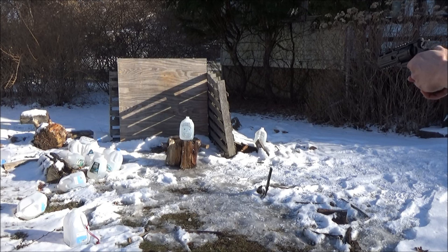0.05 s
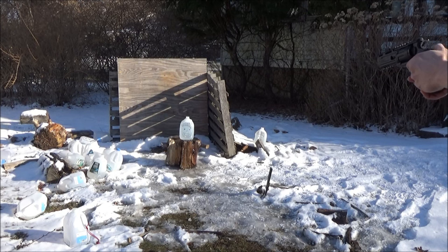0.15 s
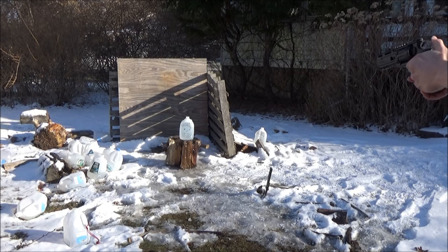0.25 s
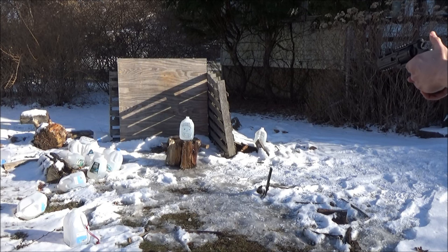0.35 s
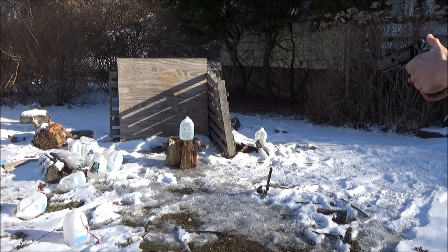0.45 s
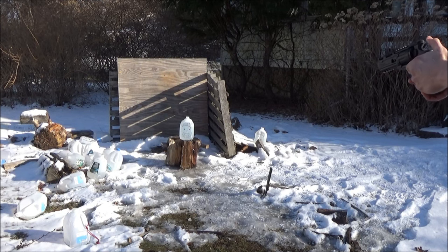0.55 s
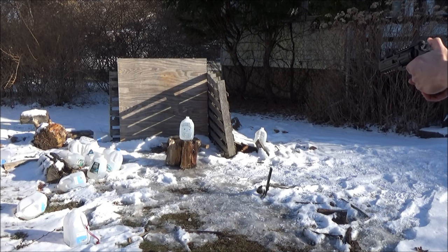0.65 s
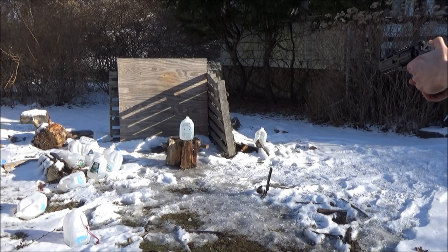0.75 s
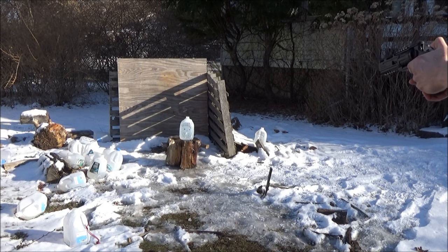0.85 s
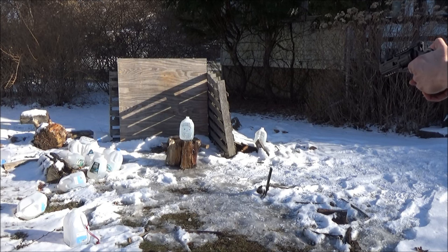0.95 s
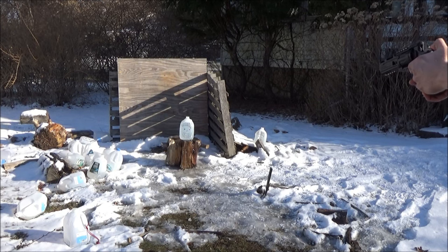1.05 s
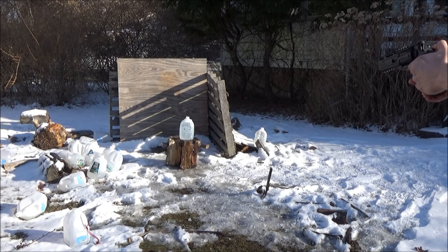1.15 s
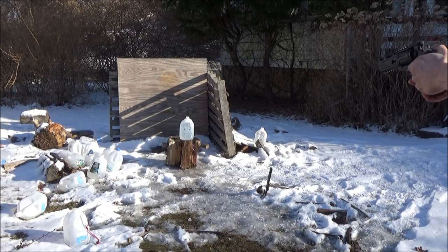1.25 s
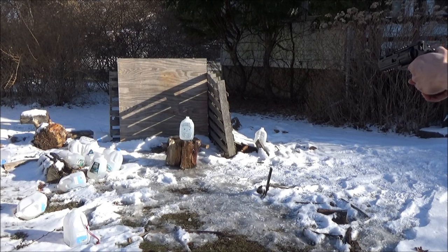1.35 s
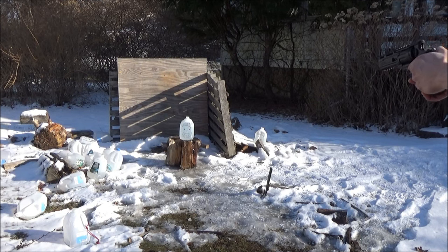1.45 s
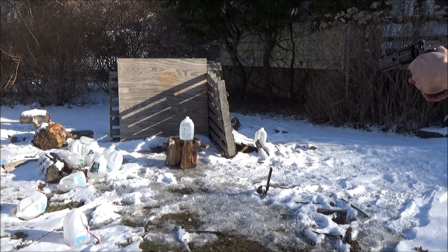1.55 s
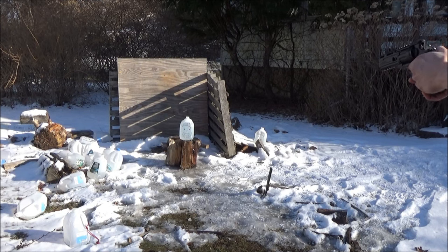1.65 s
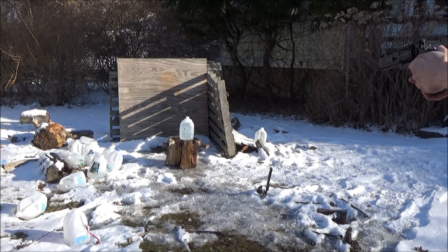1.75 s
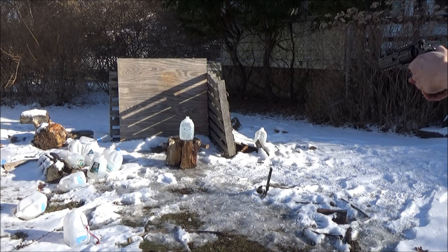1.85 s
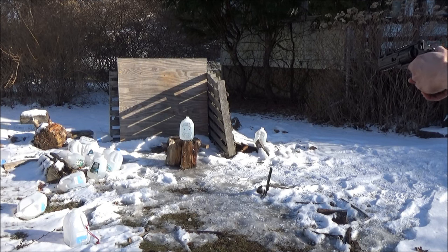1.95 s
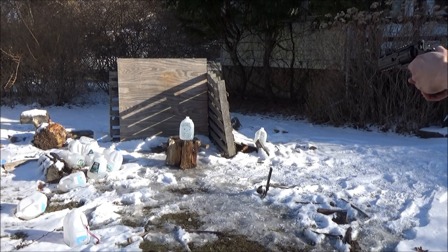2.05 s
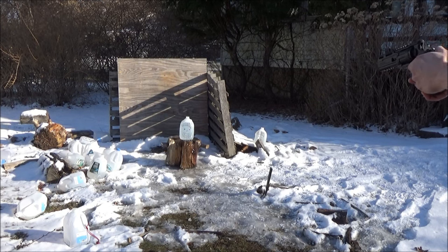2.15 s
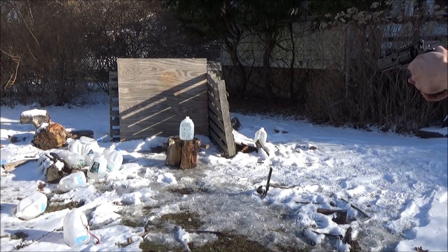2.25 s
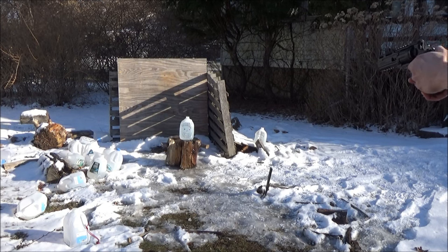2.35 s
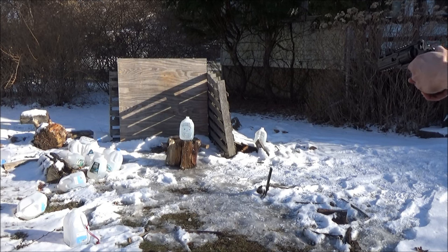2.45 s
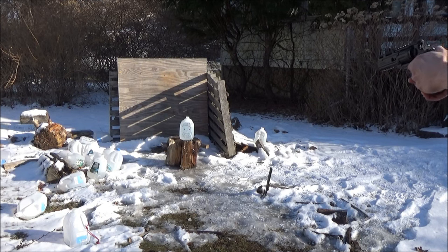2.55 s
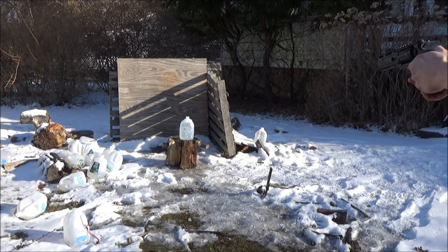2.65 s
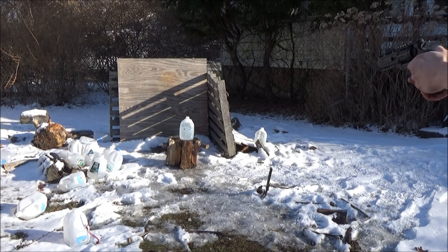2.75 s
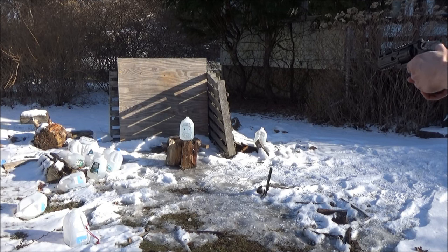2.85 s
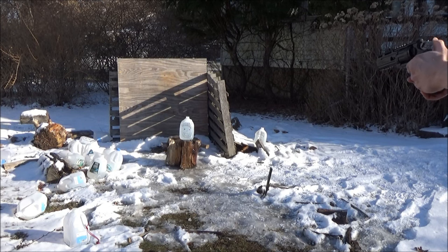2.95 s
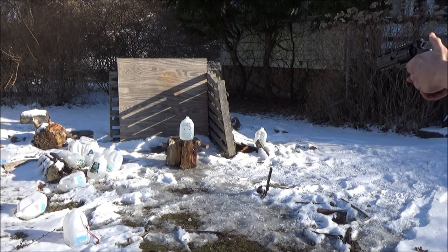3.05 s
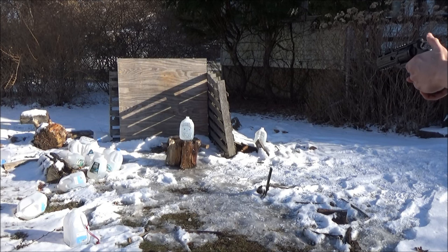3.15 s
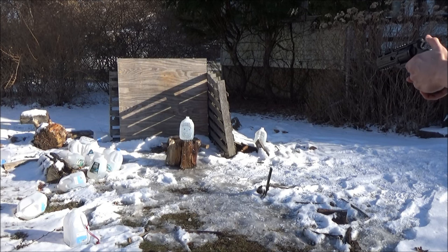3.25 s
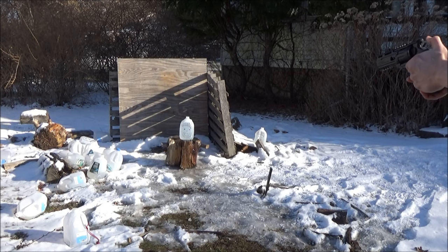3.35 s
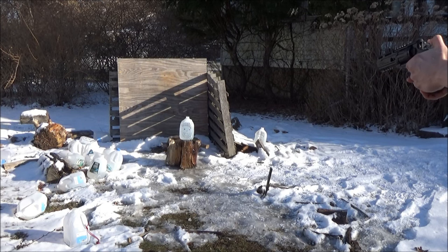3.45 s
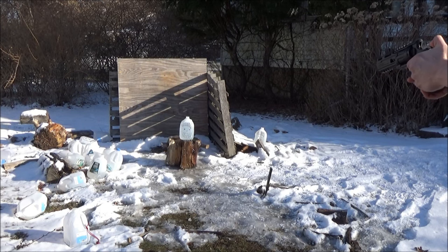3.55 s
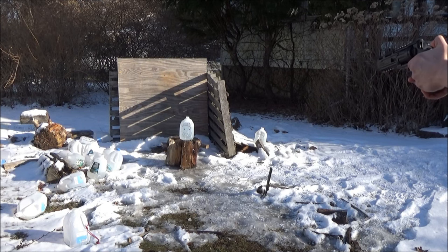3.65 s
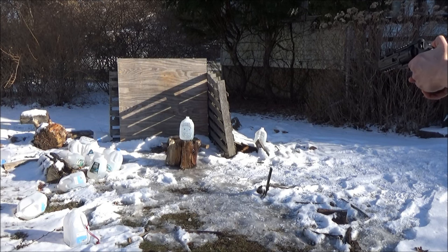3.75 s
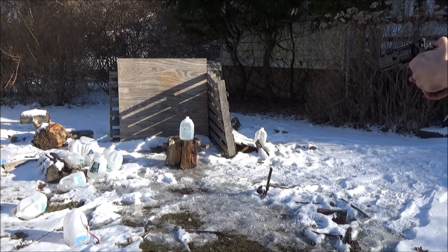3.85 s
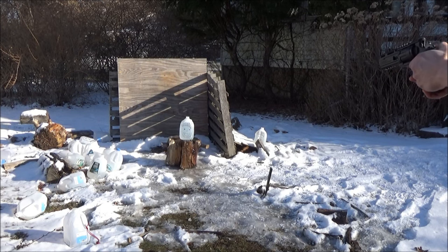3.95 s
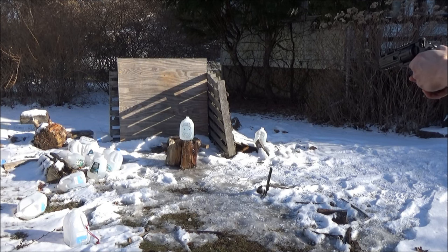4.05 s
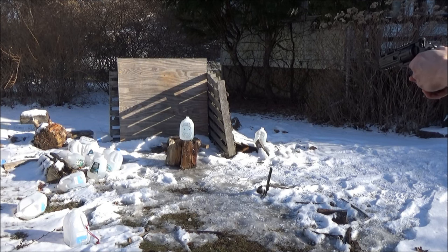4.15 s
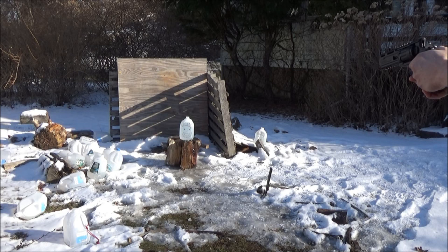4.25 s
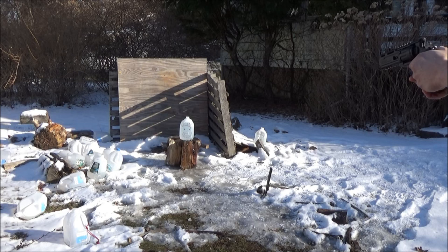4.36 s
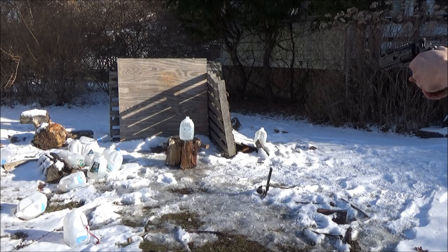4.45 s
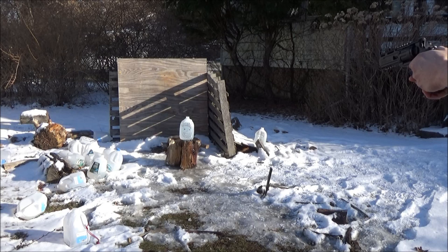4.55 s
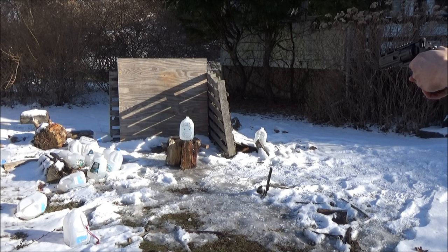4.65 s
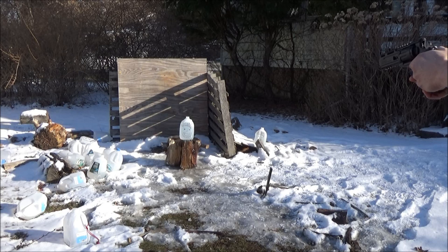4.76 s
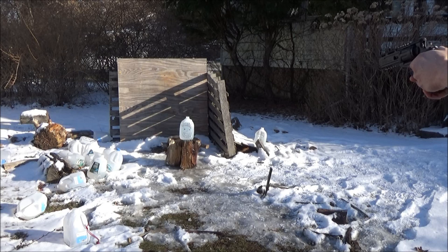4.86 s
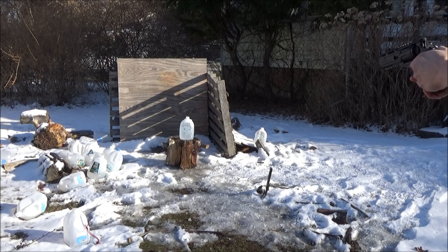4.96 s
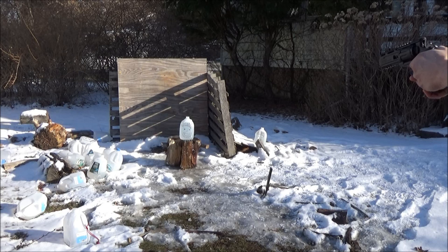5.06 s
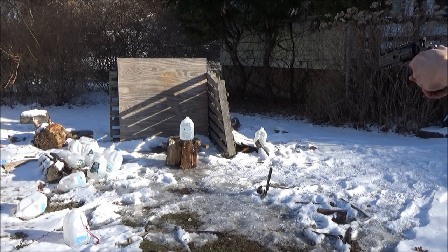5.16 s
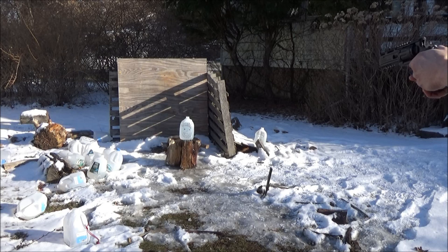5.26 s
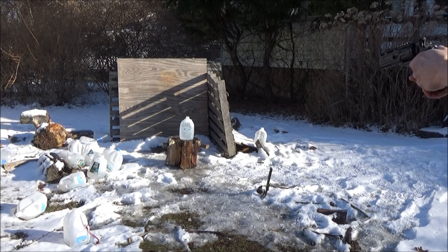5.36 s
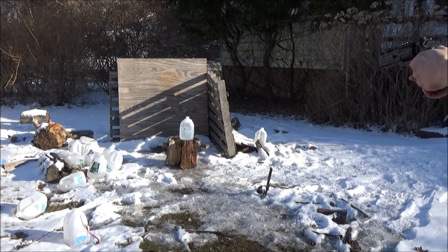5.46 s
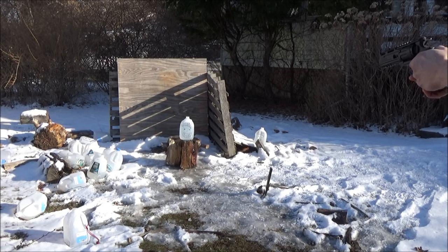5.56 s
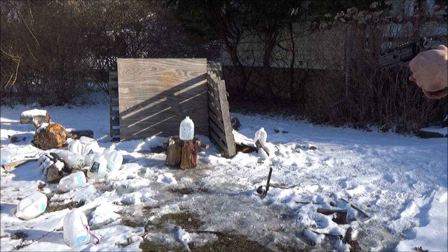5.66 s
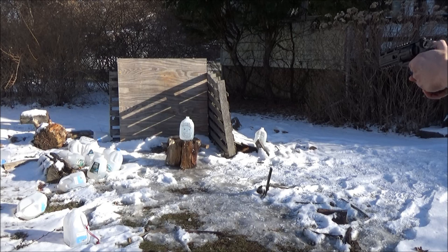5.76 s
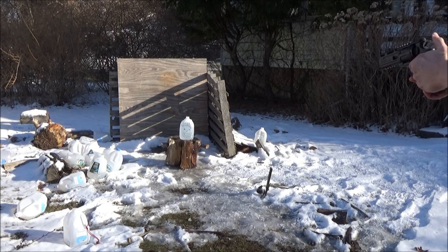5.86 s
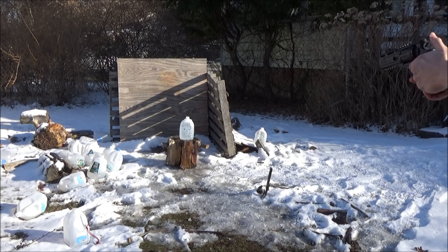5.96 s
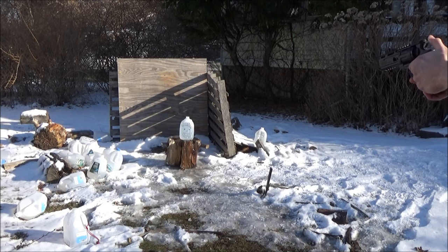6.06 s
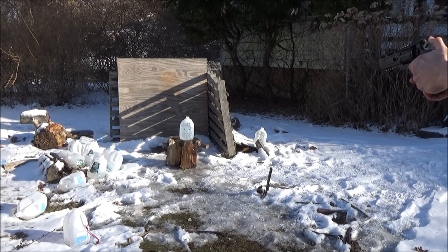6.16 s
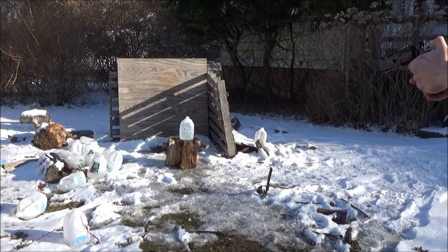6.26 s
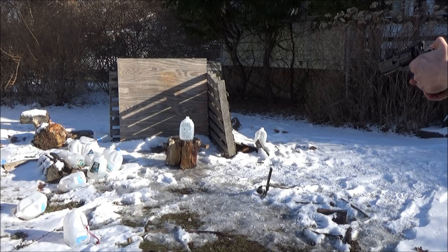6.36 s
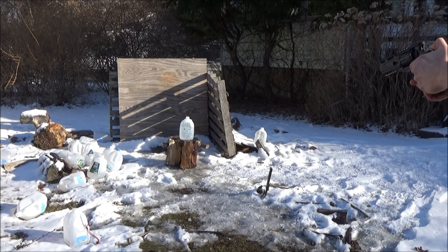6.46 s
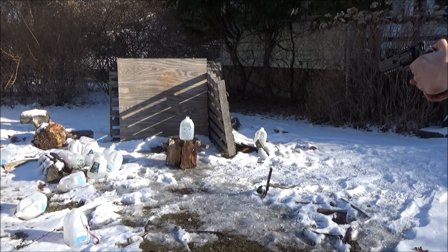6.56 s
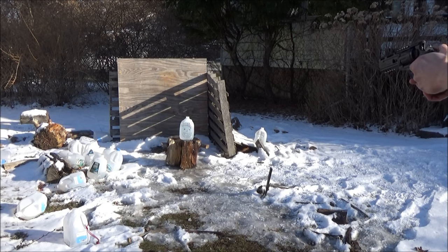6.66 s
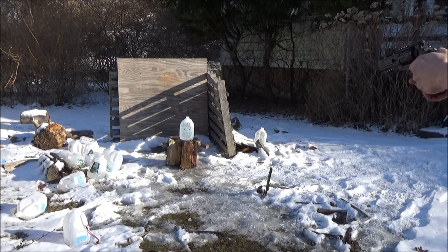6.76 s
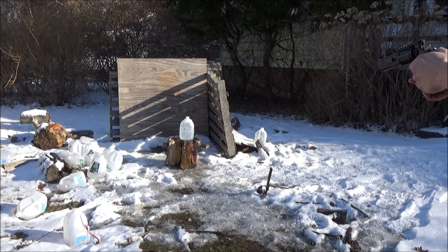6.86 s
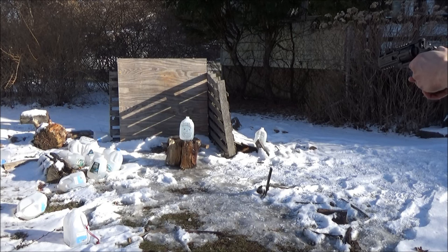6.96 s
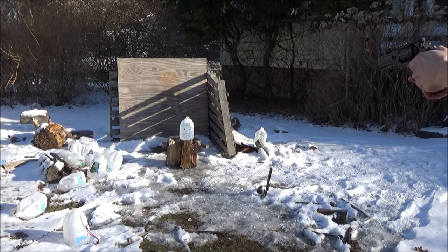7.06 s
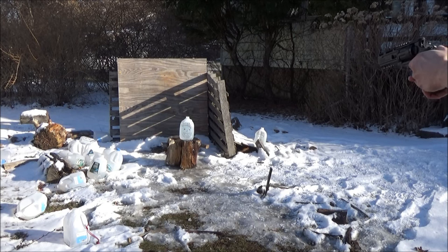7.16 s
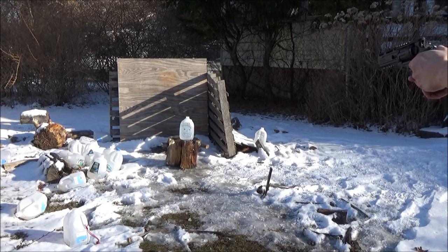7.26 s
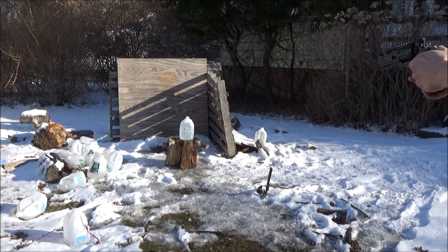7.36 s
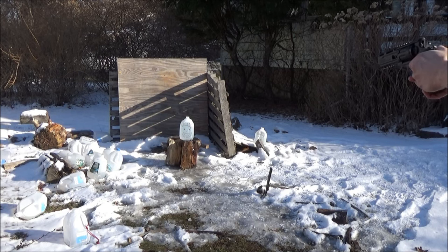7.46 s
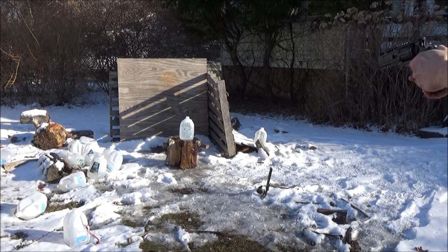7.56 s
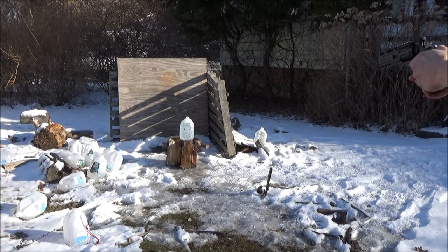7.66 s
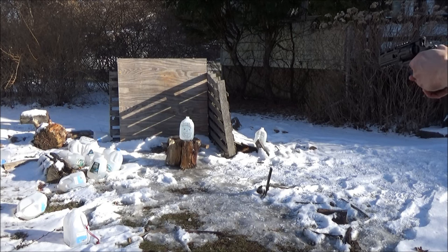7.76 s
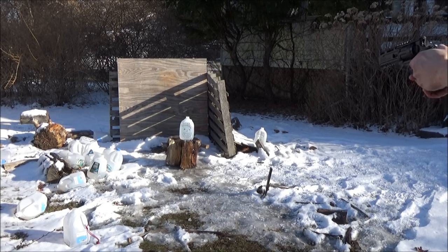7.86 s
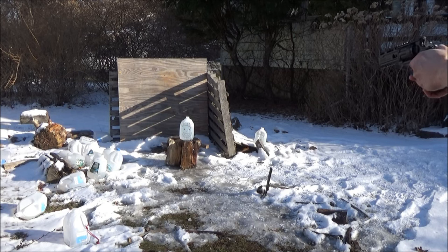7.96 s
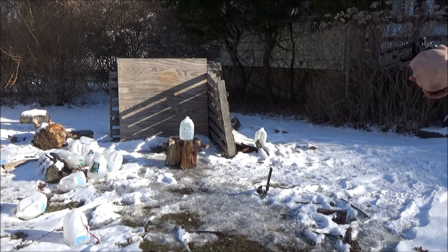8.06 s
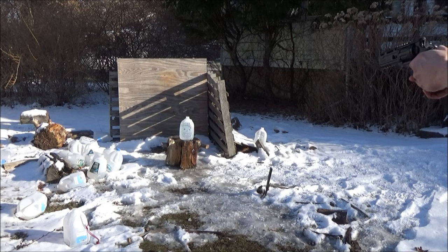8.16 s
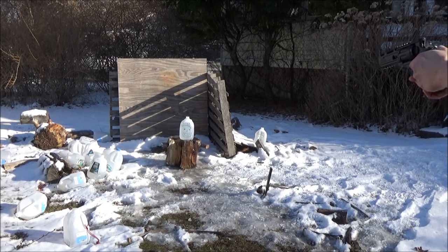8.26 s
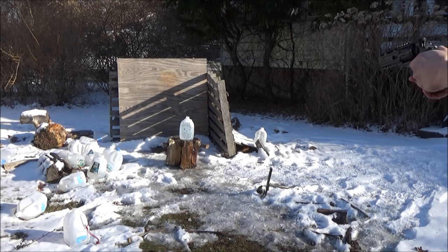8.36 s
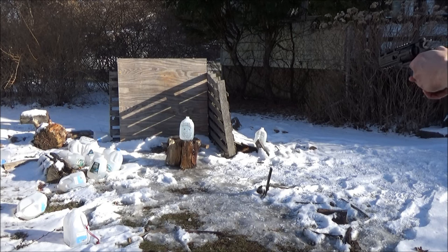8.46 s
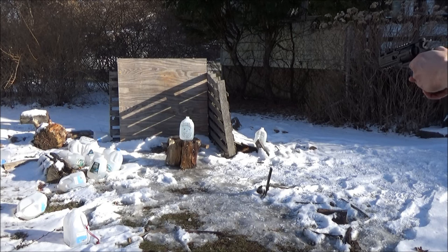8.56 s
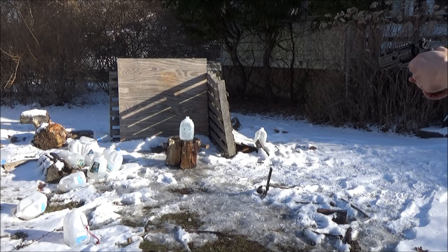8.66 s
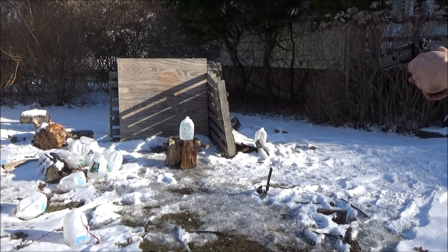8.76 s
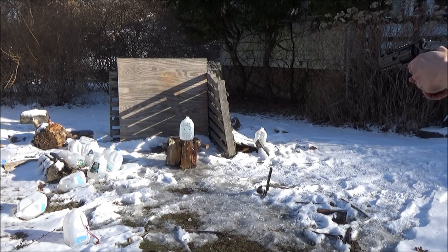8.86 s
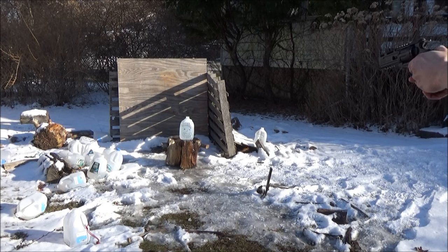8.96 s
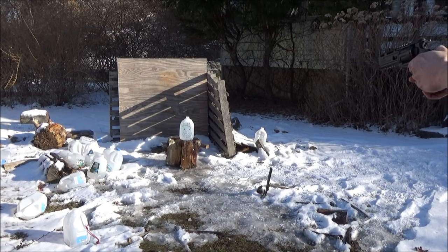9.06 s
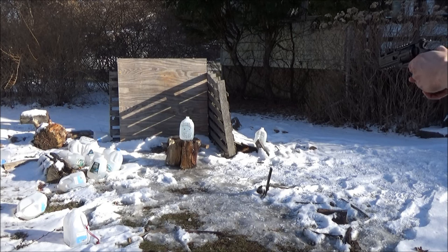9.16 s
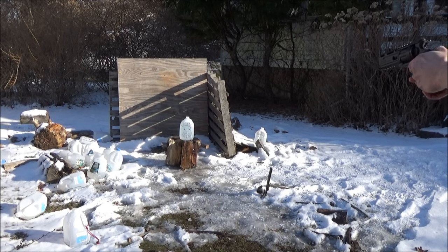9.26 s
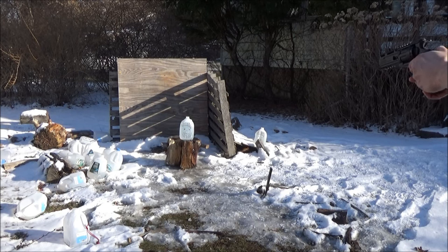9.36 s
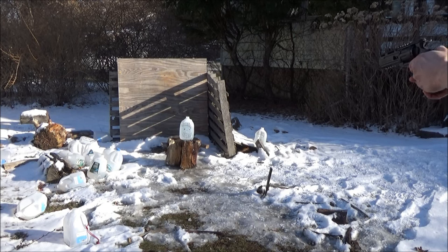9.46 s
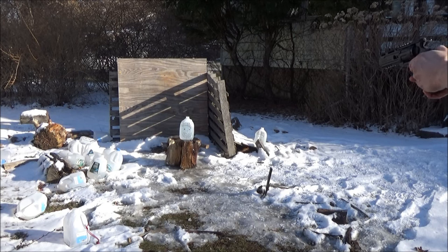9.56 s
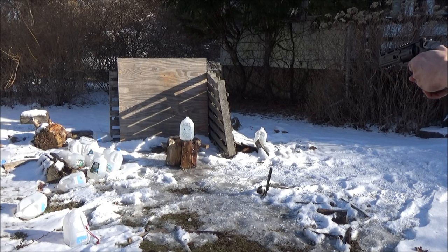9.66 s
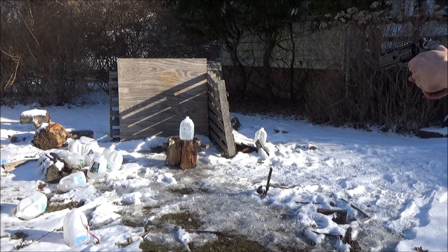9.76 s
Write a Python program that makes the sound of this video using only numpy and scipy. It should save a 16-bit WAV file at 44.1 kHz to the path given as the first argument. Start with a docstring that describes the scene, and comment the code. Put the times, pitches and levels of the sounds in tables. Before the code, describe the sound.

A gas revolver fires four sharp pops outdoors, with metallic cocking clicks between shots, over faint dripping meltwater and light wind.

```python
"""A gas revolver, cocked and fired four times in a snowy yard, close to the microphone.
Each pop is a burst of gas that rings the barrel and comes back off fences, boards, bushes and far houses;
the pellet thumps its target, and hammer, cylinder and trigger click. Meltwater drips and crackles close
by, over light wind and a distant hum. The gain control ducks everything after each shot."""
import sys
import numpy as np
from scipy import signal
from scipy.fft import rfft, irfft, next_fast_len
from scipy.io import wavfile
from scipy.ndimage import uniform_filter1d

SR = 44100
rng = np.random.default_rng(int(sys.argv[2]) if len(sys.argv) > 2 else 0)


def to_wav(s):
    """Save 16-bit WAV."""
    ch = np.atleast_2d(s).T  # columns
    pcm = np.round(np.clip(ch, -1, 1) * 32767)  # PCM
    wavfile.write(sys.argv[1], SR, pcm.astype(np.int16))


N = 432619


def gain_of(db):
    """Decibels to a factor."""
    return 10 ** (np.asarray(db) / 20)


def unit_rms(x):
    """Scales to rms 1."""
    return x / np.sqrt(np.mean(x ** 2) + 1e-20)


def add(mix, start_s, sound):
    """Mixes a sound in at a time."""
    part = mix[round(start_s * SR):][:len(sound)]
    part += sound[:len(part)]


def highpass(x, order, hz):
    """Rolls off the bass."""
    return signal.sosfilt(signal.butter(order, hz, "high", fs=SR, output="sos"), x)


def coloured(x, spectrum, tilt_db=0):
    """Filters by (frequency_hz, level_db) points, tilted by tilt_db an octave about 5 kHz."""
    hz = np.fft.rfftfreq(len(x), 1 / SR)
    point_hz, point_db = np.transpose(spectrum)
    db = np.interp(np.log(hz + 1), np.log(point_hz + 1), point_db)
    octaves = np.log2(np.clip(hz, 1300, 13000) / 5000)
    return irfft(rfft(x) * gain_of(db + tilt_db * octaves), len(x))


def noise(samples, spectrum, tilt_db=0):
    """Coloured noise with rms 1."""
    return unit_rms(coloured(rng.standard_normal(samples), spectrum, tilt_db))


def flicker(samples, depth_db, smooth):
    """A gain that wanders at random, smoothed over `smooth` samples."""
    return gain_of(depth_db * unit_rms(uniform_filter1d(rng.standard_normal(samples), smooth)))


def fade_in(x, rise_s):
    """Rounds the start of a sound."""
    return x * np.minimum(np.arange(len(x)) / SR / rise_s, 1)


def ring(hz, t60, glide=0):
    """A dying sine whose pitch may rise."""
    t = np.arange(round(.06 * SR)) / SR
    return np.sin(2 * np.pi * hz * (t + glide * t ** 2)) * gain_of(-60 * t / t60)


def snap(samples, spectrum, t60, rise_s, tilt_db):
    """A sudden burst of coloured noise with peak 1."""
    t = np.arange(samples) / SR
    burst = noise(samples, spectrum, tilt_db) * np.minimum(t / rise_s, 1) ** 2 * gain_of(-60 * t / t60)
    return burst / abs(burst).max()


# Wind on the microphone: time_s, rumble_db, deep_db
WIND_LEVELS = [(0.0, -52.5, -56), (1.06, -51.5, -57), (1.828, -62, -69.5), (2.678, -59.5, -59.5),
               (2.87, -46, -70), (2.95, -52.5, -50), (4.86, -60.5, -74), (5.05, -54.5, -79),
               (5.458, -62, -69), (6.14, -53, -55), (6.39, -66, -73), (6.53, -54, -58), (6.86, -67.5, -74),
               (7.24, -50.5, -60), (7.29, -58, -71), (8.0, -66.5, -74), (8.41, -55.5, -52.5),
               (8.632, -74, -76), (8.74, -61.5, -59), (9.81, -60, -59.5)]
# Puffs that roar across it: middle_s, half_length_s, level_db
WIND_PUFFS = [(0.952, 0.32, -56.5), (3.083, 0.025, -49), (3.283, 0.025, -55.5), (4.402, 0.067, -56),
              (4.735, 0.1, -51.5), (5.204, 0.28, -60), (6.167, 0.046, -53), (6.59, 0.031, -50.5),
              (7.035, 0.031, -60), (7.246, 0.026, -56), (7.494, 0.037, -58.5), (8.393, 0.35, -61.5)]
# The wind's rumble, deepest rumble and roar, and the hum from afar: frequency_hz, level_db
RUMBLE_SPECTRUM = [(30, -35), (60, -25), (112, 1.5), (195, -0.5), (321, -19), (500, -19), (650, -17.5),
                   (1100, -120)]
DEEP_SPECTRUM = [(12, -28), (25, -13), (60, -1), (90, 5), (140, -9), (300, -64)]
ROAR_SPECTRUM = [(120, -4), (250, 4.5), (400, -6.5), (600, -18), (900, -23.5)]
HUM_SPECTRUM = [(120, -70), (200, 0.5), (409, 0.5), (883, -2.5), (968, 1), (1160, -5.5), (2510, -11.5),
                (5130, -10.5), (7830, -8.5), (12400, -6.5), (15100, -23), (16000, -4)]

def air():
    """Lumpy wind right on the microphone, over a steady distant hum and hiss."""
    t = np.arange(N) / SR
    times, rumble_db, deep_db = np.transpose(WIND_LEVELS)
    eddies = uniform_filter1d(uniform_filter1d(rng.standard_normal(N), 900), 900)
    lumps = gain_of(2 * unit_rms(eddies))
    rumble = unit_rms(lumps * noise(N, RUMBLE_SPECTRUM)) * gain_of(np.interp(t, times, rumble_db))
    deep = noise(N, DEEP_SPECTRUM) * gain_of(np.interp(t, times, deep_db))
    puffs = sum(gain_of(db) * np.exp(-((t - middle) / half) ** 2) for middle, half, db in WIND_PUFFS)
    roar = unit_rms(lumps * noise(N, ROAR_SPECTRUM)) * puffs
    hum = gain_of(-54.5) * noise(N, HUM_SPECTRUM)
    return rumble + deep + roar + hum


# A drop landing close by: frequency_hz, level_db
SPLASH_SPECTRUM = [(1470, -17), (2500, -10), (3800, -4.5), (4690, 0.5), (5230, -4.5), (6200, -10),
                   (7890, 5.5), (12300, -4), (15200, -7), (16000, -1.5)]

def drip(hz, t60):
    """A wide splash, duller for big drops, plus a short ring of the tiny cavity it leaves."""
    shift = rng.uniform(.78, 1.22)  # no two surfaces splash alike
    spectrum = [(f * shift, db) for f, db in SPLASH_SPECTRUM]
    splash = snap(512, spectrum, t60, rise_s=.00052, tilt_db=1.2 * np.log2(hz / 8500))
    cavity = fade_in(ring(hz, t60, glide=20)[:512], .00012)
    drop = highpass(splash + .96 * cavity, 3, np.clip(.47 * hz, 500, 9000))
    return drop / abs(drop).max()


def sprinkle(kinds, per_s, spread_db):
    """Random drops of the given kinds, coming in clumps; rms 1."""
    clumps = flicker(N, depth_db=2, smooth=1500)
    sizes = gain_of(spread_db * np.minimum(rng.exponential(1, N), 3))
    hits = sizes * (rng.random(N) < clumps * per_s / SR)
    which = rng.integers(0, len(kinds), N)
    return unit_rms(sum(signal.oaconvolve(hits * (which == k), kind)[:N] for k, kind in enumerate(kinds)))


# Small drips around the microphone: time_s, level_db
PATTER_LEVELS = [(0, -41), (.6, -50), (1.5, -49), (3.201, -49.5), (4.999, -47), (6, -49), (7.5, -50.5),
                 (8.4, -45), (9.001, -53), (9.81, -50)]

def patter():
    """Small drops of meltwater crackle: bright ticks and a few faint plops."""
    ticks = [drip(hz, rng.uniform(.003, .011)) for hz in np.linspace(5500, 15000, 48)]
    plops = [fade_in(ring(hz, 16 / hz, rng.uniform(20, 60)), .001) for hz in np.geomspace(1500, 5000, 16)]
    drops = sprinkle(ticks, per_s=290, spread_db=3.5)
    drops += gain_of(-22) * sprinkle(plops, per_s=55, spread_db=2.5)
    return drops * gain_of(np.interp(np.arange(N) / SR, *np.transpose(PATTER_LEVELS)))


# The pop at close range, the barrel's ringing gas column, the far echo: frequency_hz, level_db
POP_SPECTRUM = [(290, -12), (500, -10), (570, -8.5), (621, -11.5), (843, -10.5), (1530, -8), (2290, -7.5),
                (2610, -6), (5090, 2), (5710, 5), (9220, 7.5), (14000, 5), (15200, 5), (16000, 5)]
BARREL_SPECTRUM = [(4800, -21), (5550, 31), (5800, -17), (6600, 19), (7600, -15), (9000, 10), (9800, 29),
                   (10300, 6), (11000, -25)]
FAR_SPECTRUM = [(300, -22), (800, -13), (1100, 7.5), (1500, 3), (2500, -2), (4000, -6), (8000, -18)]
# Smeared arrivals, the hammer's puff first, then rough surfaces around the yard:
# delay_s, rise_s, length_s, t60_s, level_db, tilt_db_per_octave, barrel_db
SMEARED_ARRIVALS = [(-.0098, 0.0029, 0.0035, .02, -22, -5, -27),
                    (.0003, 0.00055, 0.0011, 0.0087, -12.5, -5.5, -7),
                    (.005, 0.00082, 0.0099, 0.012, -15.5, -2, -11),
                    (.0155, 0.0009, 0.007, 0.016, -23.5, -5.5, -3),
                    (0.019, 0.0012, .006, 0.019, -16, -2, -21), (0.029, 0.0079, 0.014, 0.1, -24, -3.2, -6),
                    (0.05, 0.0031, 0.019, 0.086, -25.5, -4.5, -32),
                    (0.059, 0.0051, 0.034, 0.14, -19.5, -4, -14.5),
                    (0.114, 0.034, 0.054, 0.21, -26, -3.5, -22.5), (0.203, .01, 0.14, 0.33, -44, -7.5, -29)]
# Dull returns from distant houses: delay_s, length_s, t60_s, level_db
HOUSE_ECHOES = [(0.223, 0.18, 0.67, -54.5), (0.319, 0.021, 0.13, -43), (0.428, 0.12, 0.86, -57.5)]
# Sharp arrivals, direct and off hard flat surfaces: delay_s, level_db
SHARP_ARRIVALS = [(.0004, -5), (.0014, -6), (.0028, -1), (.0166, 1), (.0299, 3), (.0315, -6), (.0451, 3),
                  (.0467, 1), (.0584, 2), (.072, -9), (.079, -8), (.0873, -7), (.1005, -12), (.158, -10),
                  (.163, -15)]
# Dull thuds in the yard's echo: delay_s, level_db, pitch_hz, t60_s
ECHO_THUDS = [(0, -64, 453, 0.02), (.006, -48, 400, 0.022), (.016, -23.5, 412, 0.017),
              (.021, -28.5, 467, 0.027), (0.053, -31, 344, 0.034), (.066, -33, 495, 0.098),
              (.093, -27.5, 310, 0.034)]
LEAD_S = .01  # room for the hammer's puff ahead of the pop

def pop():
    """One burst of gas from the muzzle and everything the yard sends back."""
    t = np.arange(SR) / SR - LEAD_S
    out = np.zeros(SR)

    def envelope(delay, rise, length, t60):
        """Rises, holds, then dies away."""
        return np.clip((t - delay) / rise, 0, 1) * gain_of(-60 * np.maximum(t - delay - length, 0) / t60)

    for delay, rise, length, t60, db, tilt_db, barrel_db in SMEARED_ARRIVALS:
        grain = unit_rms(flicker(SR, depth_db=2.9, smooth=30))  # many small reflectors
        hiss = noise(SR, POP_SPECTRUM, tilt_db) + gain_of(barrel_db) * noise(SR, BARREL_SPECTRUM)
        out += gain_of(db) * envelope(delay, rise, length, t60) * grain * hiss
    for delay, length, t60, db in HOUSE_ECHOES:
        out += gain_of(db) * envelope(delay, .01, length, t60) * noise(SR, FAR_SPECTRUM)
    for delay, db in SHARP_ARRIVALS:
        slap = snap(256, POP_SPECTRUM, t60=.0015, rise_s=.0001, tilt_db=.8)
        add(out, LEAD_S + delay, gain_of(db) * slap)
    for delay, db, hz, t60 in ECHO_THUDS:
        add(out, LEAD_S + delay, gain_of(db) * ring(hz, t60))
    return out


def pellet_strike():
    """The pellet hits the target: a thump whose pitch sags quickly and settles."""
    start_hz, settle_hz, sag_s, t60 = 1140, 310, .00787, .11
    t = np.arange(3000) / SR
    hz = settle_hz + (start_hz - settle_hz) * np.exp(-t / sag_s)
    thump = np.sin(2 * np.pi * np.cumsum(hz) / SR)
    return fade_in(thump, .0067) * gain_of(-25 - 60 * t / t60)


# Shots close to the microphone: start_s, level_db, trigger_slip_after_s, trigger_travel_s
SHOTS = [(.059, 0, .1794, .005), (2.756, -.5, .1867, .0044), (5.5691, -.5, .1937, .0085),
         (8.5553, -1, .1864, .0063)]

def gunfire():
    """Each shot pops, and the thump from the target arrives 75 ms later."""
    out = np.zeros(N)
    for start, db, *_ in SHOTS:
        add(out, start - LEAD_S, gain_of(db) * pop())
        add(out, start + .075, gain_of(db) * pellet_strike())
    return out


def click(modes, tilt_db):
    """A blow and a brief chatter ring one metal part; peak 1."""
    t = np.arange(2000) / SR
    ringing = sum(gain_of(db + 2 * rng.standard_normal()) * ring(hz * rng.uniform(.98, 1.02), t60)
                  for hz, db, t60 in modes)
    chatter = np.minimum(t / .0005, 1) ** 2 * (gain_of(-60 * t / .004) + .05 * gain_of(-60 * t / .06))
    force = signal.unit_impulse(len(t), 20) + .34 * chatter * rng.standard_normal(len(t))
    struck = coloured(signal.oaconvolve(ringing, force), [(1, 0)], tilt_db)
    thin = highpass(struck, 4, 1100)  # small parts radiate no bass
    return thin / abs(thin).max()


# Resonances of the hammer and frame, and of the cylinder: pitch_hz, level_db, t60_s
FRAME_MODES = [(1760, -11, 0.021), (3000, -4, .006), (3550, 5.5, 0.0043), (4130, 10.5, 0.006),
               (5360, -3, 0.011), (6700, 0, 0.0045), (8550, 6, 0.0042), (10000, 1, 0.0049),
               (13500, -2, 0.0024)]
CYLINDER_MODES = [(1500, -27, 0.0022), (2450, -8, 0.022), (2800, 6, 0.0063), (4200, 13, 0.0036),
                  (5600, 8.5, 0.0054), (6550, 6, 0.0057), (9170, 5, 0.0041), (10600, 2, 0.0025),
                  (13000, -10.5, 0.00091)]
# Clicks within each move of the action, heard close up: delay_s, level_db, tilt_db_per_octave
TRIGGER_SLIP = [(0.0005, -13, 1)]
TRIGGER_STOP = [(0, -5.5, 3), (.0042, -14.5, 3), (0.029, -19, 9)]
PAWL_LIFT = [(0, -25, 6), (.0022, -28, 6)]
CYLINDER_TURN = [(-.0006, -13, 5.1), (.0007, -7, 2.2), (.0055, -17, 4), (0.0298, -13.5, 11)]
HAMMER_LATCH = [(.0005, -8, 1.5), (.006, -20, 2.5), (0.031, -26, 3)]
# The thumb cocks the hammer between shots: turn_s, latch_s, pawl_s, level_db
COCKINGS = [(.9747, 1.0349, .9645, 0), (3.6537, 3.7216, 3.6452, -.5), (6.453, 6.5, 6.4475, .3)]

def gun_action():
    """The trigger slips back and stops; on cocking, pawl, cylinder and hammer click in turn."""
    moves = []
    for start, db, slip, travel in SHOTS:
        moves += [(start + slip, db, TRIGGER_SLIP, FRAME_MODES),
                  (start + slip + travel, db, TRIGGER_STOP, FRAME_MODES)]
    for turn, latch, pawl, db in COCKINGS:
        moves += [(pawl, db, PAWL_LIFT, CYLINDER_MODES),
                  (turn, db, CYLINDER_TURN, CYLINDER_MODES),
                  (latch, db, HAMMER_LATCH, FRAME_MODES)]
    out = np.zeros(N)
    for start, db, clicks, modes in moves:
        for delay, click_db, tilt_db in clicks:
            add(out, start + delay, gain_of(db + click_db) * click(modes, tilt_db))
    return out


# Drips close by and, at 8.53 s, a small trigger click: start_s, level_db, pitch_hz
CLOSE_TICKS = [(0.4722, -23.5, 3800), (0.592, -28, 4400), (0.811, -26, 7700), (0.819, -24.5, 7550),
               (0.9053, -24.5, 12600), (1.223, -24, 11700), (1.309, -15.5, 13800), (1.3445, -24, 4530),
               (1.6473, -29, 6850), (1.7982, -27.5, 6700), (1.805, -18.5, 8130), (1.8886, -22.5, 7230),
               (1.902, -28, 7450), (1.907, -30, 9100), (1.958, -36, 7500), (1.989, -34, 7450),
               (2.0222, -25, 10400), (2.028, -27, 11100), (2.09, -37, 9500), (2.056, -27.5, 7800),
               (2.159, -33, 11500), (2.2379, -26, 4460), (2.2958, -26.5, 4340), (2.355, -26, 9200),
               (2.3736, -25.5, 10000), (2.4662, -23.5, 3880), (2.5356, -29, 7670), (2.595, -23, 7440),
               (3.032, -20.5, 8900), (3.2204, -20, 3300), (3.237, -27, 6500), (3.254, -24.5, 3040),
               (3.308, -31, 8100), (3.457, -27, 9600), (3.687, -23, 9500), (3.276, -24, 4100),
               (3.3302, -26, 5850), (3.385, -24.5, 7960), (3.398, -29, 6900), (3.498, -23.5, 12100),
               (3.5241, -24, 4550), (3.6754, -19.5, 5840), (3.8065, -22, 11300), (3.9198, -29.5, 5900),
               (4.0798, -19, 7500), (4.0994, -29, 11800), (4.1142, -13, 11600), (4.217, -25, 7910),
               (4.303, -29, 6060), (4.3405, -27, 7740), (4.5243, -22, 8060), (4.77, -27, 9000),
               (4.814, -22, 6560), (4.8334, -20.5, 8460), (4.919, -23.5, 11400), (5.0434, -23.5, 6000),
               (5.056, -23, 13400), (5.2043, -36, 8400), (5.2612, -25.5, 2800), (5.3174, -25, 10300),
               (5.387, -23, 8300), (5.3933, -24, 10700), (5.4714, -22, 11700), (5.4883, -25, 12000),
               (5.88, -18, 7240), (6.309, -26, 11000), (6.3573, -29, 4600), (6.542, -24.5, 9150),
               (6.6128, -21, 8100), (6.8, -33, 8000), (6.862, -48, 5500), (6.894, -44, 7500),
               (7.0003, -27, 11300), (7.005, -31, 6550), (7.0354, -25.5, 4080), (7.0598, -29, 8000),
               (7.098, -35, 8000), (7.119, -32, 4190), (7.154, -30, 4540), (7.1836, -34, 7500),
               (7.211, -26, 3900), (7.232, -26, 7500), (7.247, -24, 7190), (7.2995, -28, 8300),
               (7.4044, -29, 7070), (7.4597, -25, 7900), (7.5893, -27, 9050), (7.6276, -26, 6700),
               (7.7137, -24, 9300), (7.736, -25, 6050), (7.867, -27, 9200), (7.9397, -28.5, 6700),
               (7.9938, -26, 4400), (8.328, -28, 7000), (8.4137, -22, 11600), (8.4555, -26.5, 7550),
               (8.508, -29, 14600), (8.53, -26.5, 4240), (8.824, -26, 6150), (9.0552, -29, 7750),
               (9.139, -23.5, 5070), (9.2392, -19, 11500), (9.29, -25.5, 8510), (9.312, -28, 4020),
               (9.3402, -31, 7600), (9.401, -36, 4000), (9.421, -23, 13100), (9.496, -38.5, 3300),
               (9.575, -33, 5270), (9.646, -30, 5550), (9.717, -41, 4200), (9.747, -26.5, 7840),
               (9.7843, -20, 3760)]

def close_ticks():
    """Sharp ticks of one shape: meltwater drips, and a small trigger click just before the last shot."""
    out = np.zeros(N)
    for start, db, hz in CLOSE_TICKS:
        add(out, start - .0004, gain_of(db) * drip(hz, t60=.0045))
    return highpass(out, 2, 1500)  # the ticks have no bass


# Nearby drips that trap a bubble: start_s, level_db, pitch_hz, glide_per_s
BUBBLES = [(3.219, -28, 3380, 1.6), (4.369, -44.5, 1014, 10), (4.812, -31.5, 1890, 77),
           (5.076, -42.5, 1860, 3.2), (5.093, -40.5, 1680, 5.4), (5.26, -27.5, 1870, 37),
           (5.418, -43, 986, 2.8), (5.534, -39, 1900, 18), (7.315, -36.5, 1720, 74),
           (7.439, -44, 1630, 5.1), (7.643, -39, 1740, 41), (7.768, -40.5, 1310, 5.8),
           (8.028, -44.5, 1280, 46), (8.114, -36, 3120, 5), (8.193, -43, 865, 38), (9.325, -47, 1650, 5.4),
           (9.338, -40, 2700, 18), (9.36, -47, 610, 58), (9.393, -48, 1500, 20), (9.432, -44, 1750, 15),
           (9.592, -55, 1250, 2), (9.715, -48, 2120, 5), (9.729, -57, 1260, 15), (9.413, -38, 1800, 42),
           (9.473, -43, 2040, 5), (9.644, -36, 1120, 88), (9.681, -37, 1860, 36), (9.777, -39, 1620, 79),
           (9.784, -36, 3150, 34)]

def bubbles():
    """Trapped air rings with a rising pitch; the faster it glides, the sooner it bursts."""
    steady_cycles, burst_s = 40, .008
    out = np.zeros(N)
    for start, db, hz, glide in BUBBLES:
        t60 = steady_cycles / hz / (1 + burst_s * glide)
        tone = fade_in(ring(hz, t60, glide), .0011)
        churn = flicker(len(tone), depth_db=3.5, smooth=60)  # the surface is never still
        add(out, start, gain_of(db) * tone * churn)
    return out


# One moan of wind in the yard: middle_s, half_length_s, level_db, low_hz, top_hz
WIND_MOAN = (4.5, 0.1, -49, 268, 461)

def wind_moan():
    """A puff moans briefly, a soft tone that rises and falls."""
    middle, half, db, low_hz, top_hz = WIND_MOAN
    arch = np.exp(-((np.arange(N) / SR - middle) / half) ** 2)
    hz = low_hz + (top_hz - low_hz) * arch ** 2
    return gain_of(db) * arch * np.sin(2 * np.pi * np.cumsum(hz) / SR)


def ground_tails(crackle):
    """Short tails off the ground; drops land at different spots, so the tail changes every 15 ms."""
    spot = np.repeat(rng.integers(0, 8, N // 660 + 1), 660)[:N]
    tails = rng.standard_normal((8, 3000)) * gain_of(-60 * np.arange(3000) / SR / .036)
    return sum(signal.oaconvolve(crackle * (spot == k), tail / np.linalg.norm(tail))[:N]
               for k, tail in enumerate(tails))


# Faint stereo spread: frequency_hz, side_gain_db
STEREO_SPREAD = [(50, -34), (300, -20), (1000, -31), (2500, -64), (6000, -19.5), (10000, -27), (14000, -47)]

def scene():
    """The yard, nearly mono, with a faint phase-shifted stereo spread and a little wide air noise."""
    revolver = gunfire() + gun_action()
    crackle = close_ticks() + bubbles() + patter()
    mid = revolver + crackle + gain_of(-7.5) * ground_tails(crackle) + air() + wind_moan()
    phase_shifted = signal.hilbert(mid, next_fast_len(N)).imag[:N]
    side = coloured(phase_shifted + gain_of(-11) * air(), STEREO_SPREAD)
    return mid + np.array([side, -side])


def record(dry):
    """The gain drops at once on loud sound and recovers slowly; peaks are squeezed, band edges cut."""
    threshold_db, duck_db_per_db, ceiling, edge_hz = -39.5, .31, .33, 15800
    power_db = 10 * np.log10(abs(uniform_filter1d((dry ** 2).mean(0), 1300)) + 1e-12)
    fall_db = np.arange(N) * 19.6 / SR  # the held level sinks 19.6 dB a second
    held_db = np.maximum.accumulate(power_db + fall_db) - fall_db
    over_db = np.maximum(held_db - threshold_db, 0)
    ducked = dry / gain_of(duck_db_per_db * uniform_filter1d(over_db, 200))
    squeezed = ceiling * np.tanh(ducked / ceiling)
    lowpass = signal.firwin(511, edge_hz, window=("kaiser", 9), fs=SR)
    return signal.oaconvolve(highpass(squeezed, 1, 50), lowpass[None], "same")


dry = scene()
out = record(dry)
to_wav(out)
```